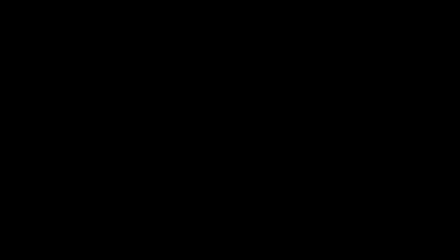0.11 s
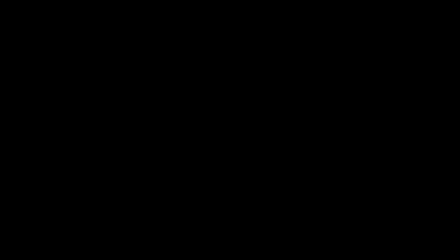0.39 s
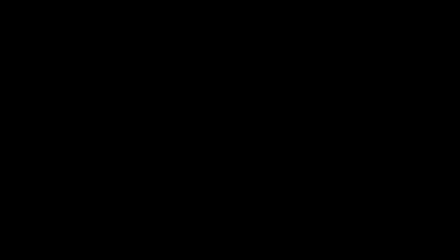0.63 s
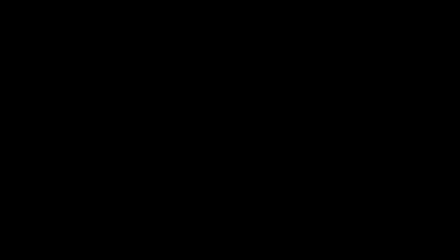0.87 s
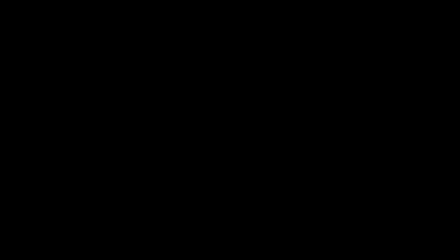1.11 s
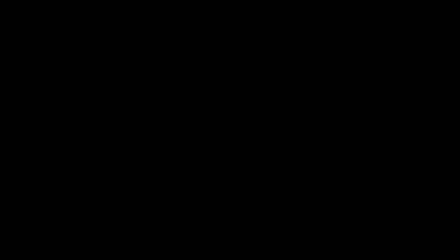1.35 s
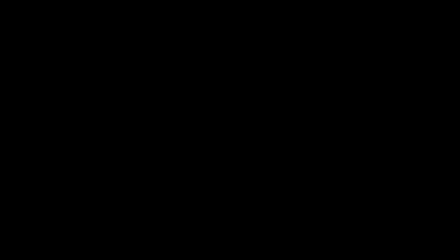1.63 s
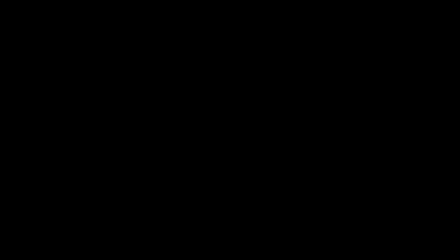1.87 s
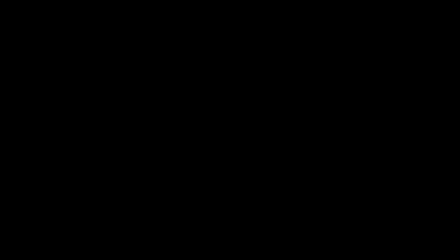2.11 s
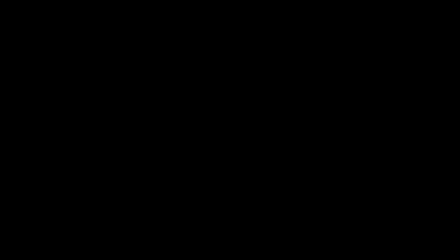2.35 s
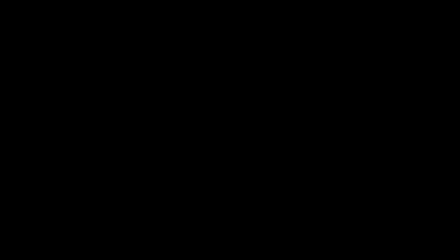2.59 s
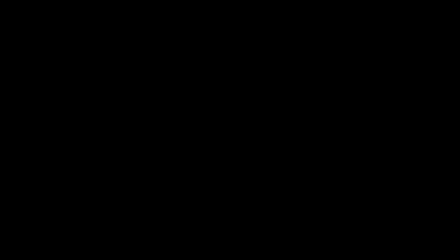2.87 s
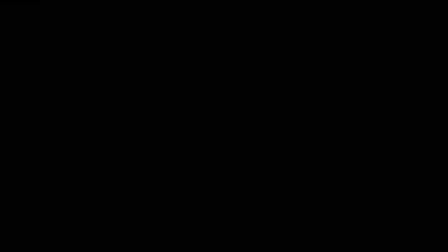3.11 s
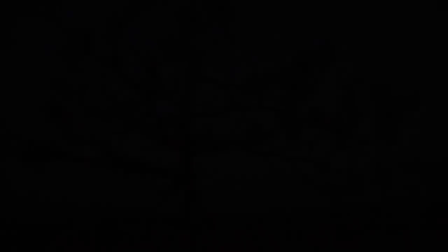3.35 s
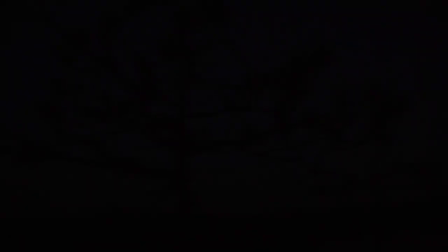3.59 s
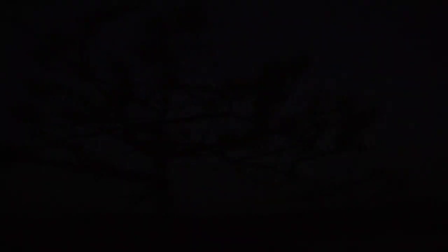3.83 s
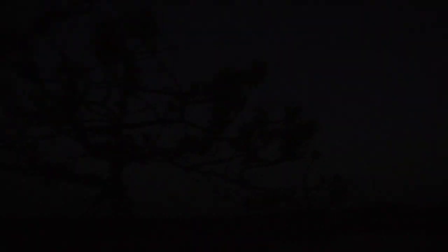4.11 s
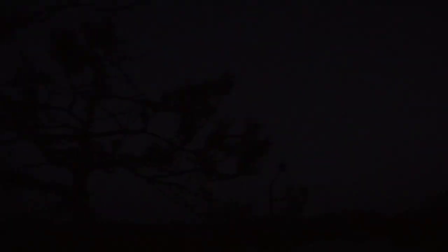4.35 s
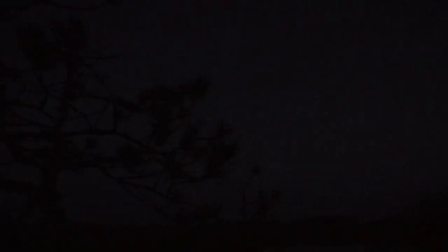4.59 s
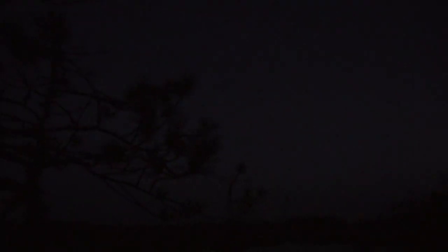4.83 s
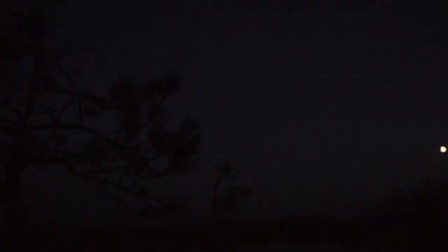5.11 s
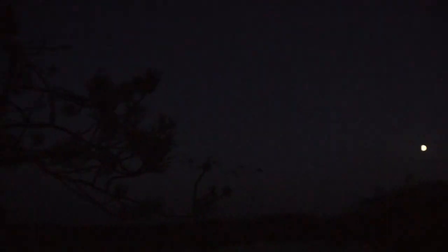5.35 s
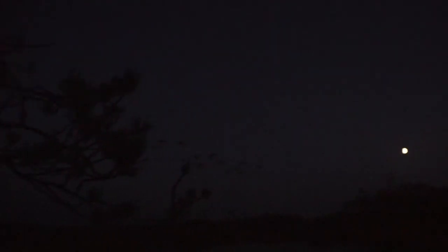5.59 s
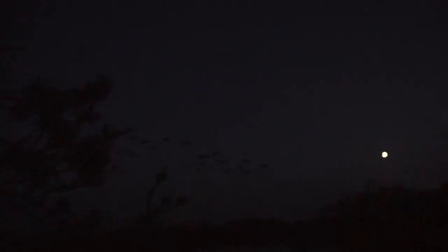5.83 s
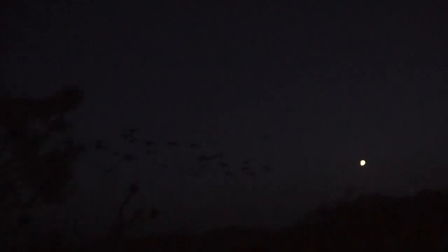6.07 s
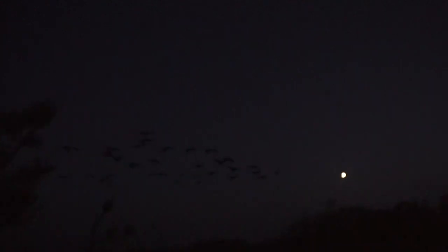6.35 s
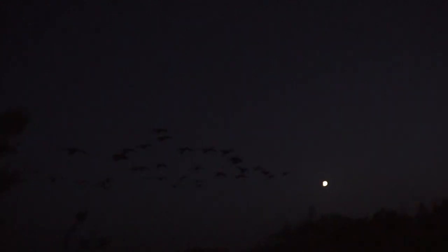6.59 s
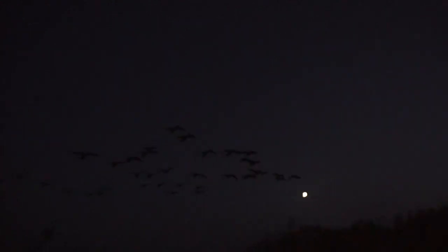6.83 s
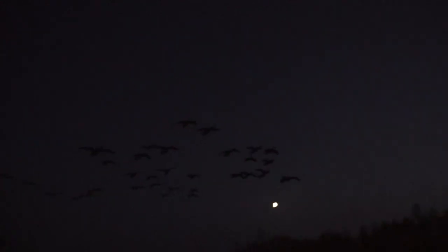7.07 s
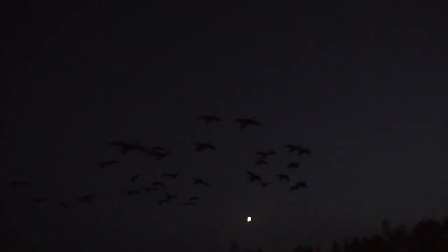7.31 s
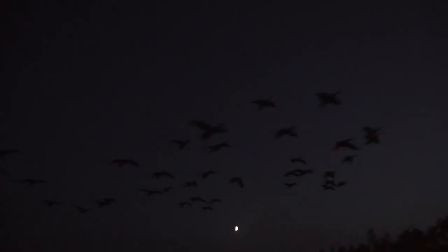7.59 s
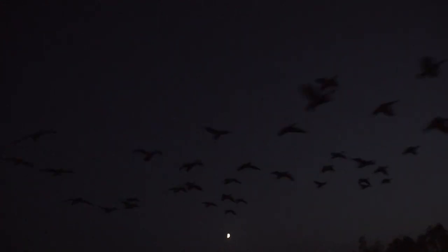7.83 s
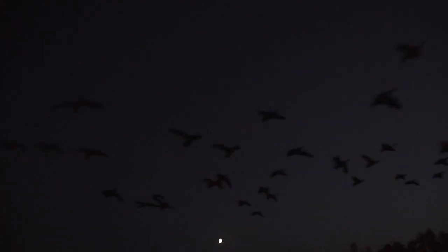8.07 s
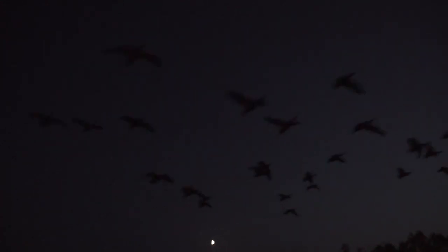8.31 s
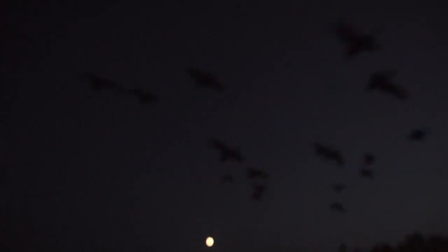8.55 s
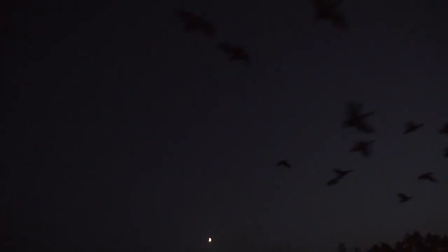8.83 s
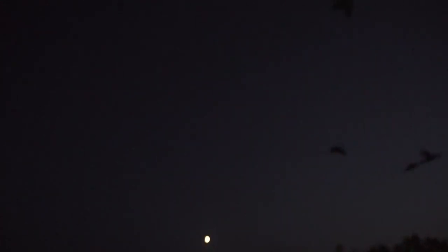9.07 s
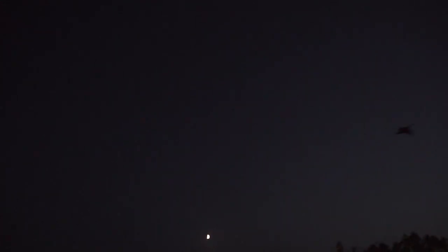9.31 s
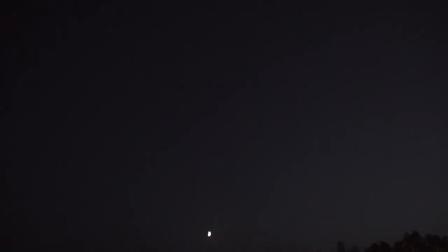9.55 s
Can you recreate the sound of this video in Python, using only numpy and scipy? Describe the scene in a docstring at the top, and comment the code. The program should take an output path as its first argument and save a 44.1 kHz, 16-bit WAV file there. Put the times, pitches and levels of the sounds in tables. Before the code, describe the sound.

A flock of wild geese flies over at dusk, raspy low honks breaking into high cries, growing louder until a few very close calls.

```python
"""Open country at dusk: a flock of geese passes overhead.
Each voice flips between a clear high cry and a low, raspy honk: pulse trains through throat filters.
A smaller bird pipes between them (two swept sines); far birds murmur at random; one soft knock.
Tree lines return a long faint echo (decaying noise); wings rush over a soft hiss (shaped noise)."""
import sys
import numpy as np
from scipy import signal
from scipy.fft import rfft, irfft, next_fast_len
from scipy.io import wavfile
from scipy.ndimage import uniform_filter1d

SR = 44100
rng = np.random.default_rng(int(sys.argv[2]) if len(sys.argv) > 2 else 0)


def waveform_to_disk(signal):
    """Save audio, clipped to [-1, 1], as 16-bit WAV at the path in sys.argv[1]."""
    frames = np.transpose(np.atleast_2d(signal))
    scaled = np.clip(frames, -1, 1) * 32767
    samples = np.round(scaled).astype(np.int16)
    wavfile.write(sys.argv[1], SR, samples)


N = 426888


def gain_of(db):
    """Decibels to a factor."""
    return 10 ** (np.asarray(db) / 20)


def evened(x):
    """Scales to rms 1."""
    return x / np.sqrt(np.mean(x ** 2) + 1e-20)


def read(points, hz):
    """Reads a spectrum on a log-frequency axis."""
    f, value = np.transpose(points)
    return np.interp(np.log(hz + 1), np.log(f + 1), value)


def fade(u, rise, fall):
    """Smooth rise and fall over the shares rise and fall of u from 0 to 1."""
    return np.sin(np.pi / 2 * np.clip(np.minimum(u / rise, (1 - u) / fall), 0, 1)) ** 2


# evening hiss: hz, level_db
HISS_SPECTRUM = [(25, -100), (157, -88), (240, -77.5), (400, -82.5), (800, -82), (1430, -70), (2260, -78),
                 (14600, -85), (15800, -88)]
# colour of the wing rush: hz, level_db (added to rush_db)
WING_COLOUR = [(60, -26), (170, -29), (260, -15.5), (500, -10), (1200, -6.5), (3000, -17), (14000, -28)]
# nearness of the rest of the flock: time_s, rush_db
WING_RUSH = [(0, -69), (1, -76.5), (2.7, -65), (5.3, -65), (6.3, -99), (7, -60.5), (7.7, -61), (8.4, -61.5),
             (9.68, -58.5)]
# left-right likeness of the air: hz, correlation (-1 to 1)
AIR_LIKENESS = [(60, 0.64), (200, 0.032), (500, 0.82), (2000, 0.85), (9000, 0.14)]


def air():
    """Random short-time spectra: soft hiss plus the patchy rush of wings."""
    size, hop = 1024, 256  # samples
    frames, hz = N // hop + 2, np.fft.rfftfreq(size, 1 / SR)
    t = np.arange(frames) * hop / SR
    a, b, c, d, patches = rng.standard_normal((frames, size // 2 + 1, 5)).T
    patches = evened(uniform_filter1d(uniform_filter1d(patches, 12, 0), 14, 1))
    rush_db = np.interp(t, *np.transpose(WING_RUSH))
    rush = gain_of(read(WING_COLOUR, hz)[:, None] + rush_db + 2.8 * patches)
    hiss = gain_of(read(HISS_SPECTRUM, hz)[:, None] + 1.2 * patches)
    same = np.clip(read(AIR_LIKENESS, hz), -1, 1)[:, None]
    left = a + 1j * b
    right = same * left + np.sqrt(1 - same ** 2) * (c + 1j * d)
    z = np.array([left, right]) * np.hypot(rush, hiss)
    return signal.istft(z, nperseg=size, noverlap=size - hop)[1][:, :N]


# echo decay: hz, t60_s
ECHO_DECAY = [(300, 0.15), (1500, 2.23), (4000, 1.2), (12000, 1.4)]
ECHO_DB = -23.5
SLAP_S, SLAP_DB, SLAP_WIDTH_S = .26, -12, .012  # one hillside answers distinctly within the echo


def tree_lines(x):
    """Scattered far reflections that build up, then die band by band."""
    hz, t, z = signal.stft(rng.standard_normal((2, 2 * SR)), SR, nperseg=256)
    z *= gain_of(-60 * t / read(ECHO_DECAY, hz)[:, None]) * np.minimum(t / 0.007, 1)
    slap = np.exp(-((t - SLAP_S) / SLAP_WIDTH_S) ** 2)
    z *= np.sqrt(1 + gain_of(SLAP_DB) ** 2 / SLAP_WIDTH_S * slap)
    tail = signal.istft(z, SR, nperseg=256)[1]
    tail /= np.linalg.norm(tail[0])
    echo = signal.fftconvolve(x[None], tail, axes=1)[:, :N]
    return gain_of([[-2.2], [2.2]]) * echo  # stronger on the right


# bearing of the calling birds: time_s, left_minus_right_db
BIRD_BEARING = [(.2, -2), (1.5, -4), (1.65, 1), (4, 1.5), (4.6, 2.5), (8, 3), (8.15, -4.5), (8.752, -5),
                (9.68, -18)]


def add(mix, s, sound):
    """Pans a sound by the bearing at its middle and adds its bounce off rough, scattering ground."""
    half_db = np.interp(s + len(sound) / SR / 2, *np.transpose(BIRD_BEARING)) / 2
    bounce = rng.standard_normal(900) * gain_of(-60 * np.arange(900) / SR / .03)
    bounce /= np.linalg.norm(bounce)
    heard = np.r_[sound, np.zeros(899)] + .4 * signal.oaconvolve(sound, bounce)
    part = mix[:, round(s * SR):][:, :len(heard)]
    part += gain_of([[half_db], [-half_db]]) * heard[:part.shape[1]]


# knock: start_s, level_db, pitch_hz, t60_s
KNOCKS = [(3.983, -38.5, 304, 0.05)]


def knock():
    """A low, soft knock: one decaying sine, panned with the birds, bounced off the ground, no tree-line echo."""
    mix = np.zeros((2, N))
    for s, db, hz, t60 in KNOCKS:
        t = np.arange(round(t60 * SR)) / SR
        tone = gain_of(db - 60 * t / t60) * np.sin(2 * np.pi * hz * t) * np.minimum(t / 0.0041, 1)
        add(mix, s, tone)
    return mix


MURMUR_DB, MURMUR_CRY_SHARE = 5.5, .25  # level over rush_db; share of far birds that cry


def far_flock(count=70):
    """Distant birds murmur at random: low, dull, hoarse honks with a swooping cry now and then."""
    mix = np.zeros((2, N))
    for when, pitch, size, span, kind in rng.random((count, 5)):
        s = when * N / SR
        db = np.interp(s, *np.transpose(WING_RUSH)) + MURMUR_DB + 6 * (size - 1 / 2)
        if kind < MURMUR_CRY_SHARE:
            s, sound = cry(s, .04 + .06 * span, 800 + 800 * pitch, 720 + 750 * pitch, db, 2 * ARCH * size)
        else:
            s, sound = honk(s, .04 + .05 * span, 200 + 130 * pitch, db, .55, -6)
        add(mix, max(s, 0), sound)
    return mix


# piped whistles: start_s, length_s, top_hz, level_db, leap_share (of the middle two thirds)
PIPE_CALLS = [(5.429, 0.14, 2310, -54, .35), (5.57, 0.14, 2345, -52.5, 0.31),
              (6.634, 0.083, 2170, -51, 0.59), (6.72, 0.095, 2320, -51, 0.32), (6.822, .1, 2478, -43.5, .3),
              (7.574, 0.15, 2626, -42.5, 0.59), (7.807, 0.15, 2420, -37.5, 0.4),
              (9.503, .14, 2360, -58, .4)]
PIPE_LOW = .56  # resting pitch as a share of the top


def pipe(s, length, top_hz, db, leap):
    """A thin, slightly hoarse two-harmonic whistle that leaps up and drops back."""
    u = np.linspace(0, 1, round(length * SR))
    lifted = fade(np.clip(1.5 * u - .25, 0, 1), leap, leap + .08)
    hz = top_hz * (PIPE_LOW + (1 - PIPE_LOW) * lifted)
    turn = 2 * np.pi * np.cumsum(hz) / SR
    hoarse = 1 + .5 * evened(uniform_filter1d(rng.standard_normal(len(u)), 120))
    tone = np.sin(turn) + .3 * np.sin(2 * turn)
    weaker_high = np.sqrt(PIPE_LOW * top_hz / hz)
    return s, gain_of(db) * weaker_high * hoarse * tone * fade(u, .15, .15)


def syrinx(hz, jitter, rasp):
    """Sharp closing pulses with wavering pitch, and a bright puff of noise after each."""
    waver, noise, swell = rng.standard_normal((len(hz), 3)).T
    turns = np.cumsum(hz * (1 + jitter * evened(uniform_filter1d(waver, 130)))) / SR
    top = int(14000 / hz.max())
    half = np.pi * (turns % 1) + 1e-9
    pulses = 1 - np.sin((2 * top + 1) * half) / np.sin(half)  # all harmonics up to top, in phase
    pulses *= gain_of(3 * rasp * evened(uniform_filter1d(swell, 150)))  # uneven strength
    puffs = (.25 + np.exp(-(turns % 1) / .3)) * (noise - uniform_filter1d(noise, 10))
    return evened(pulses) + rasp * .85 * evened(puffs)


def through(x, throat, lift_db_per_octave=0, small=1):
    """Minimum-phase throat filter: small < 1 lowers it, > 1 raises it; treble tilts above 1800 Hz."""
    hz = np.fft.rfftfreq(1024, 1 / SR)
    db = read(throat, hz / small) + lift_db_per_octave * np.clip(np.log2(hz / 1800 + 1e-9), 0, 1.5)
    db += 12 * np.clip(np.log2(hz / throat[0][0] + 1e-9), -4, 0)  # little radiates far below the voice
    level = np.log(gain_of(np.r_[db, db[-2:0:-1]]))
    taps = np.fft.ifft(np.exp(np.conj(signal.hilbert(level)))).real[:512]
    return signal.oaconvolve(x, taps)[:len(x)]


# low honks: start_s, length_s (before lead and stretch), pitch_hz, level_db, rasp (0-1)
HONK_CALLS = [(0.253, 0.048, 298.4, -48.5, 0.63), (0.363, 0.041, 355, -41, 0.77),
              (0.437, 0.1, 318.5, -47.5, 0.63), (0.538, 0.044, 357.4, -43.5, 0.96),
              (0.673, 0.043, 284, -48, 0.93), (1.074, 0.027, 319, -44.5, 0.4),
              (1.263, 0.064, 315.5, -48.5, 1), (1.636, 0.087, 322.6, -48, 1), (1.77, 0.1, 296, -46.5, 0.84),
              (2.034, 0.067, 329, -36.5, 0.97), (2.25, 0.038, 342, -45, 0.75),
              (2.322, 0.039, 244.5, -44.5, 1), (2.378, 0.035, 279, -43.5, 0.14),
              (2.633, 0.067, 336, -36.5, 0.79), (2.774, 0.038, 327.5, -40.5, 0.82),
              (2.934, 0.052, 278, -45.5, 0.34), (3.094, 0.059, 269, -45, 0.27),
              (3.229, 0.076, 297, -45, 0.57), (3.295, 0.065, 334, -48.5, 0.33),
              (3.452, 0.052, 321, -39.5, 0.74), (3.566, 0.043, 295.5, -43.5, 0.6),
              (3.599, 0.06, 317, -42.5, 0.63), (3.652, 0.068, 308, -45, 0.25),
              (3.85, 0.028, 355, -41, 0.75), (3.936, 0.071, 325.3, -45.5, 0.74),
              (4.066, 0.11, 303, -49.5, 0.36), (4.303, 0.067, 331.6, -40, 0.68),
              (4.479, 0.048, 341.5, -36, 0.59), (4.619, 0.12, 295.6, -47, 0.63), (5.19, 0.028, 220, -39, 1),
              (5.376, 0.027, 367, -43, 0.87), (5.825, 0.077, 286, -38.5, 0.99),
              (6.624, 0.049, 193.6, -48.5, 0.7), (6.887, 0.049, 279.6, -41, 0.79),
              (7.067, .06, 293, -44.5, 0.67), (7.13, 0.033, 246, -41.5, 0.92),
              (7.198, 0.082, 233.3, -45, 1), (7.353, 0.06, 236, -35, 1), (7.506, 0.11, 228.4, -44, 0.82),
              (7.661, 0.072, 292, -33.5, 0.98), (7.827, 0.12, 290.2, -32.5, 0.96),
              (7.968, 0.056, 279.6, -37, 1), (8.097, 0.034, 255, -48, 0.7), (8.155, 0.032, 285, -41, 0.65),
              (8.249, 0.087, 279.6, -44, 0.79), (8.451, 0.053, 273.6, -40.5, 0.8),
              (8.62, 0.073, 330.6, -26.5, 0.42), (8.854, 0.06, 196.2, -46, 0.3),
              (9.072, 0.11, 239.4, -47.5, 0.81), (9.331, 0.054, 237.6, -48.5, 0.75),
              (9.624, 0.044, 230.5, -53, 0.94)]
# throat and beak in a honk: hz, level_db
HONK_FORMANTS = [(200, -32), (340, -15.5), (650, -16), (950, 0.5), (1280, -0.5), (1700, -0.5), (2270, -5.5),
                 (3250, -10), (4300, -12), (5800, -11.5), (8200, -18.5), (14000, -39)]
# lowest tone of a honk heard from close: hz, level_db
CHEST_TONE = [(300, 3), (420, 9), (620, -31)]
HONK_RISE, HONK_LEAD, HONK_STRETCH = 0.29, .17, 1.4  # share of played length; shares of length_s
# treble lift, dB per octave above 1800 Hz: at 300 Hz pitch; per octave of pitch; per unit of rasp
LIFT, LIFT_PER_OCTAVE, LIFT_PER_RASP = -3.5, 1.5, 8.5
PASSED_S, AWAY_LIFT = 8.75, -21.5  # birds that have passed face away
DULL_FROM_DB, DULL_PER_DB = -45, 0.64  # fainter honks are far and lose lift
DROOP, DROOP_FROM_S = .16, .06  # share of the pitch; shortest honk that droops
NEAR_DB = -66  # rush_db above which hoarse honks show their chest tone too


def honk(s, length, hz, db, rasp, extra_lift=0):
    """Slow arched pulses; one that breaks into a cry climbs and swells; long, clear, faint ones droop."""
    u = np.linspace(0, 1, round(HONK_STRETCH * length * SR))
    lift = LIFT + LIFT_PER_OCTAVE * np.log2(hz / 300) + LIFT_PER_RASP * rasp
    lift += AWAY_LIFT * (s > PASSED_S) + extra_lift
    lift += DULL_PER_DB * min(db - DULL_FROM_DB, 0)
    cry_starts = np.transpose(ARCH_CRIES + GLIDE_CRIES)[0]
    breaks = np.any(abs(cry_starts - s - length) < .03) * rasp
    arch = 1 + 0.0621 * (1 / 3 - (2 * u - 1) ** 2) + 0.16 * breaks * (u - 1 / 2)
    arch += .05 * rasp * np.sin(2 * np.pi * (rng.uniform(1, 2) * u + rng.random()))  # hoarse ones wander
    droops = (length > DROOP_FROM_S) * (rasp < .45) * (db < DULL_FROM_DB + 4)
    arch -= DROOP * droops * u ** 2
    drive = syrinx(hz * arch, .035 * rasp ** 2, rasp)
    voice = evened(through(drive, HONK_FORMANTS, lift))
    near = np.clip((np.interp(s, *np.transpose(WING_RUSH)) - NEAR_DB) / 12, 0, 1)
    clear = (1 - rasp) * np.clip((db + 48) / 20, 0, 1)
    voice += .36 * (clear + near) * evened(through(drive, CHEST_TONE))
    level = gain_of(db + 10 * breaks * (u - 1 / 2))
    return s - HONK_LEAD * length, level * voice * fade(u, HONK_RISE, .3)


# cries that arch up and over: start_s, length_s, start_hz, end_hz, level_db
ARCH_CRIES = [(0.148, 0.012, 923, 950, -38.5), (0.29, 0.055, 1480, 1465, -43.5),
              (0.393, 0.038, 1360, 1390, -42), (0.424, 0.03, 1410, 1456, -37),
              (0.62, 0.045, 1510, 1355, -35.5), (1.098, 0.038, 1332, 1482, -36),
              (1.118, 0.035, 1530, 1630, -39), (1.304, 0.014, 947, 1106, -39.5),
              (1.694, 0.024, 950, 993, -37.5), (2.03, 0.042, 1410, 1500, -36.5),
              (2.211, 0.043, 1468, 1467, -32.5), (2.403, 0.12, 807, 613, -38.5),
              (2.514, 0.08, 976, 940, -34.5), (2.679, 0.055, 949, 916, -33), (2.812, 0.049, 936, 793, -37),
              (2.974, 0.12, 807, 620, -38.5), (3.106, 0.026, 472, 470, -36),
              (3.858, 0.042, 1350, 1458, -37), (4.35, 0.075, 961, 951, -30), (4.507, 0.051, 1006, 885, -30),
              (5.224, 0.039, 1351, 1535, -28.5), (5.401, 0.043, 1458, 1455, -28),
              (5.881, 0.032, 980, 848, -32.5), (7.423, 0.024, 995, 915, -28.5),
              (7.436, 0.027, 746, 673, -29), (7.713, 0.014, 880, 896, -29), (7.923, 0.014, 897, 859, -27),
              (8.165, 0.025, 778, 785, -37), (8.296, 0.035, 1320, 1257, -42), (8.314, 0.014, 770, 767, -35),
              (8.516, 0.073, 952, 923, -18.5), (8.687, 0.046, 951, 869, -19)]
# cries that glide; long rising ones sag on the way: start_s, length_s, start_hz, end_hz, level_db
GLIDE_CRIES = [(0.548, 0.078, 1063, 1214, -44), (1.265, 0.06, 1488, 1666, -47),
               (1.323, 0.071, 1664, 1375, -44.5), (1.379, 0.13, 975, 914, -45),
               (1.419, 0.074, 1347, 1234, -44.5), (1.883, 0.059, 1138, 924, -36),
               (1.89, 0.03, 1535, 1374, -38), (1.964, 0.071, 914, 903, -40.5), (2.064, .1, 1004, 867, -45),
               (2.139, 0.07, 1466, 1490, -39.5), (2.175, 0.034, 1107, 1140, -41.5),
               (2.582, 0.047, 885, 899, -35), (2.729, 0.049, 968, 935, -37), (3.138, 0.048, 565, 324, -40),
               (3.491, 0.012, 520, 525, -38), (3.649, 0.12, 1612, 1364, -37.5),
               (3.761, 0.095, 1155, 1151, -44), (3.881, 0.054, 1010, 880, -43.5),
               (4.023, 0.028, 1020, 1075, -40), (4.035, 0.039, 1340, 1420, -39),
               (4.419, 0.041, 884, 938, -31), (5.197, 0.034, 1330, 1489, -41.5),
               (5.252, 0.085, 1645, 1494, -41.5), (5.327, 0.085, 1512, 1552, -34),
               (5.896, 0.016, 1442, 1418, -34.5), (6.718, 0.035, 850, 908, -46.5),
               (6.917, 0.025, 1134, 1251, -35.5), (6.929, 0.13, 1627, 1397, -29.5),
               (7.044, 0.12, 1156, 1143, -39.5), (7.278, 0.092, 1062, 884, -27.5),
               (8.034, 0.016, 3240, 3270, -36.5), (8.588, 0.028, 872, 851, -20)]
# throat and beak in a cry: hz, level_db
CRY_FORMANTS = [(500, -17.5), (760, -2), (1400, 0.5), (2050, 1), (3000, -6), (3900, -4), (6200, -5.5),
                (7600, -12), (10500, -30.5)]
ARCH, SAG, SAG_FROM_S, SAG_RASP = .085, 0.049, .06, .18  # pitch shares; shortest sag; its rasp
SLIDE, SLIDE_S, CREST = 0.045, .007, .8  # slide into pitch on a carried breath; CREST < 1 = early top
FAR_LIFT = -3.5  # of the farthest cries, dB per octave above 1800 Hz
FLUTTER_HZ, FLUTTER_PITCH = 226.2, 0.15  # slow second oscillator: chops high voices, shakes pitch
FALL_DB_PER_OCTAVE, FALL_DULL_PER_OCTAVE = 28.5, 0.69  # below its top pitch a voice weakens and dulls


def cry(s, length, hz0, hz2, db, bend):
    """A harmonic stack on a bent pitch curve with a rough scoop; far birds sound duller and blurred."""
    starts, lengths, first_hz, last_hz, _ = np.transpose(ARCH_CRIES + GLIDE_CRIES)
    joined = abs(starts + lengths - s) < .012  # a jump within one breath has no scoop
    slides = np.any(joined & (abs(last_hz / hz0 - 1) < .1))
    goes_on = np.any((abs(starts - s - length) < .012) & (abs(first_hz / hz2 - 1) < .1))
    t = np.arange(round((length + (.002 if goes_on else 0.015)) * SR)) / SR
    u, v = t / t[-1], np.clip(t / length, 0, 1)

    middle_hz = (hz0 + hz2) / 2
    hz1 = middle_hz * (1 + bend)
    hz = hz0 + (hz2 - hz0) * v + (hz1 - middle_hz) * 4 * v ** CREST * (1 - v ** CREST)
    hz *= 1 + slides * SLIDE * np.exp(-t / SLIDE_S)
    far = np.clip((-27 - db) / 15, 0, 1)
    # short high cries break up at the end
    flutter = np.clip((hz1 - 1300) / 200, 0, 1) * np.clip(8 * u - 3.5, 0, 1)
    flutter *= (length < .1) * (hz1 < 2000)
    hz *= 1 + FLUTTER_PITCH * (bend > 0) * (1 - far) * flutter * np.sin(2 * np.pi * FLUTTER_HZ * t)

    onset = np.exp(-t / .006) * (1 - 1.0 * np.any(joined)) * (1 - slides)
    rasp = .05 + .3 * far + .4 * onset + SAG_RASP * (bend < 0)
    drive = syrinx(hz * (1 - .07 * onset), .004 + .01 * far, rasp)
    chop = 1 - flutter * np.sin(np.pi * FLUTTER_HZ * t) ** 2
    small = (min(hz1, 1700) / 1000) ** 0.27  # higher cry, higher throat
    voice = evened(through(drive * chop, CRY_FORMANTS, FAR_LIFT * far ** 2, small))

    fallen = np.log2(np.maximum.accumulate(hz) / hz) * (1 - goes_on) * (1 - slides)  # octaves
    dulled = uniform_filter1d(voice, size=9)
    voice += np.clip(FALL_DULL_PER_OCTAVE * fallen, 0, 1) * (dulled - voice)
    shape = fade(u, (.005 + .014 * far) / t[-1], SLIDE_S / t[-1] if goes_on else .22)
    return s - .003, gain_of(db - FALL_DB_PER_OCTAVE * fallen) * voice * shape


def scene():
    """Voices near and far, their echo, a knock, wings and the evening hiss."""
    birds = far_flock()
    for row in ARCH_CRIES:
        add(birds, *cry(*row, ARCH))
    for row in GLIDE_CRIES:
        sags = row[1] > SAG_FROM_S and row[3] > row[2]
        add(birds, *cry(*row, -SAG * sags))
    for voice, rows in ((honk, HONK_CALLS), (pipe, PIPE_CALLS)):
        for row in rows:
            add(birds, *voice(*row))
    return birds + gain_of(ECHO_DB) * tree_lines(birds.mean(0)) + knock() + air()


def low_pass(x):
    """Removes everything above the highest recorded frequency."""
    return signal.sosfilt(signal.butter(12, 15940, fs=SR, output="sos"), x)


# left-right difference kept by the microphones: hz, gain_db
SIDE_GAIN = [(2000, 3.5), (5000, -5), (10500, -6), (12000, -17)]
START_S = .1492


def record(dry):
    """Close microphones widen the lows, narrow the treble; sound cuts in after a moment of silence."""
    size = next_fast_len(N)
    side_gain = gain_of(read(SIDE_GAIN, np.fft.rfftfreq(size, 1 / SR)))
    side = irfft(rfft((dry[0] - dry[1]) / 2, size) * side_gain, size)[:N]
    pair = dry.mean(0) + np.array([side, -side])
    mix = pair * (np.arange(N) >= START_S * SR)
    return low_pass(mix)


dry = scene()
out = record(dry)
waveform_to_disk(out)
```